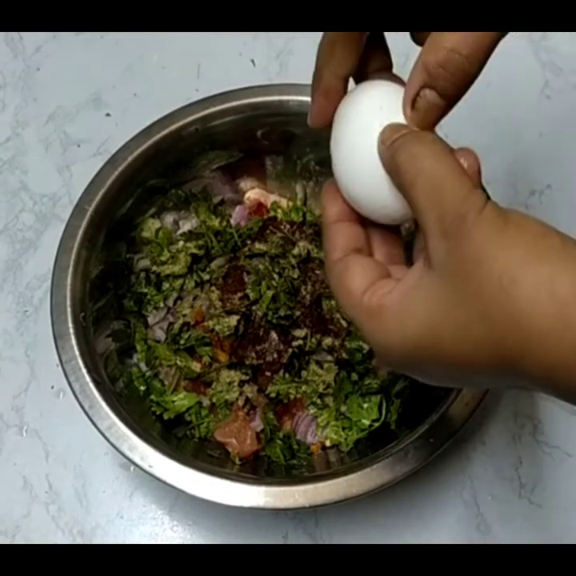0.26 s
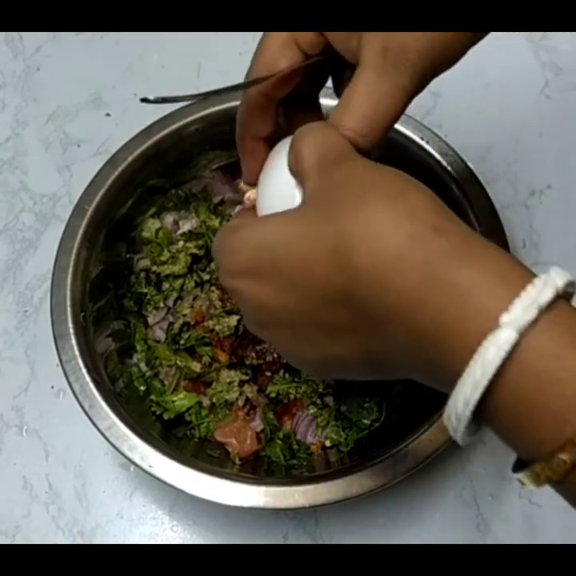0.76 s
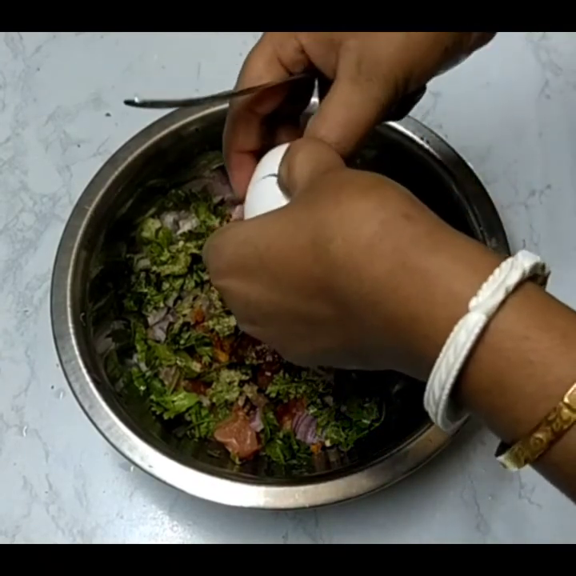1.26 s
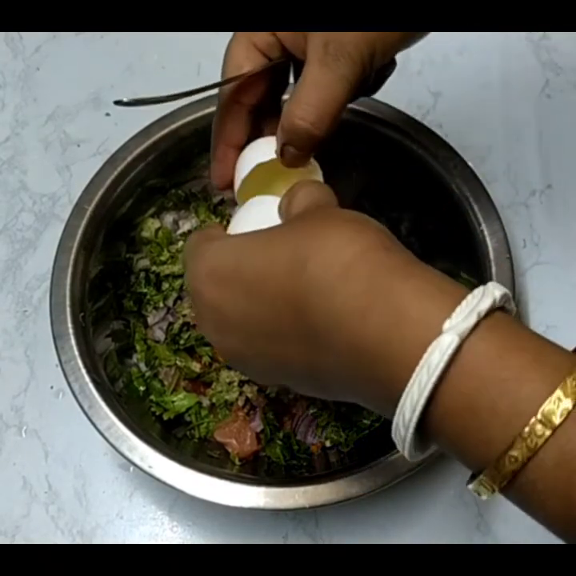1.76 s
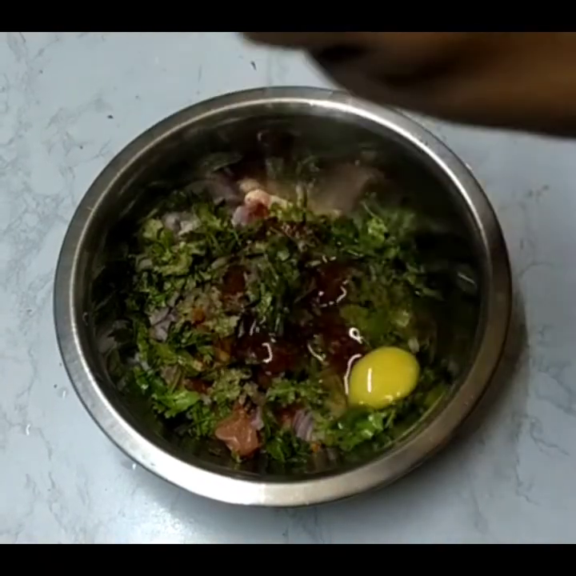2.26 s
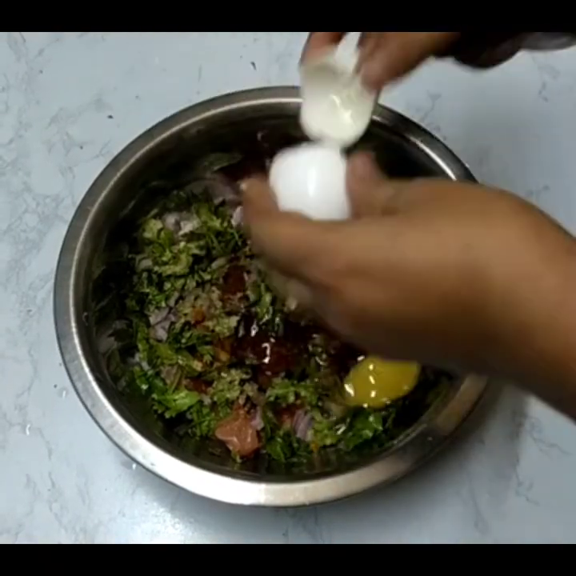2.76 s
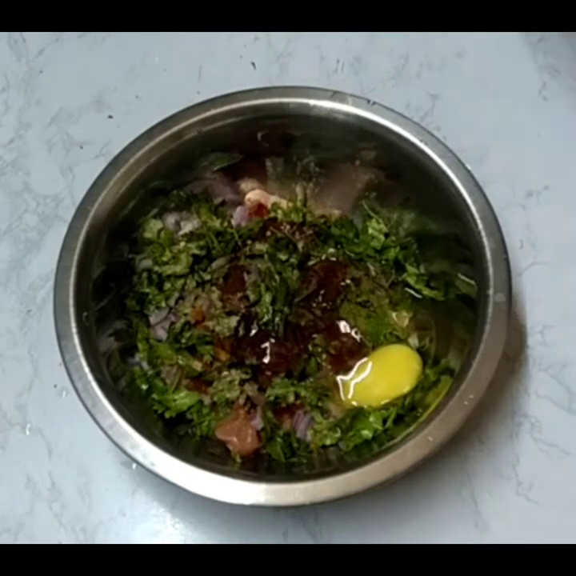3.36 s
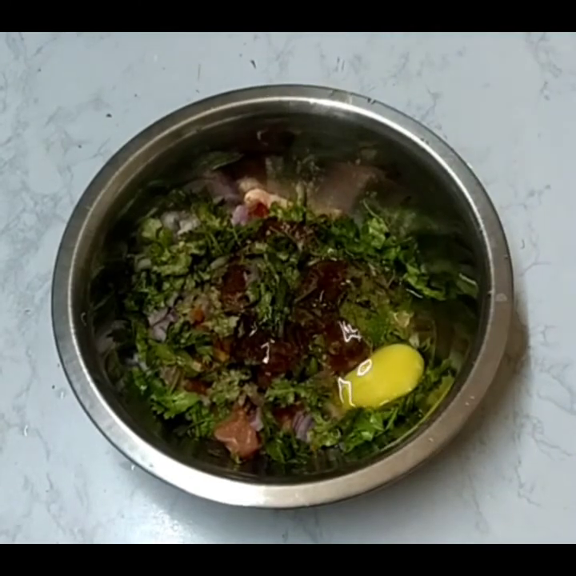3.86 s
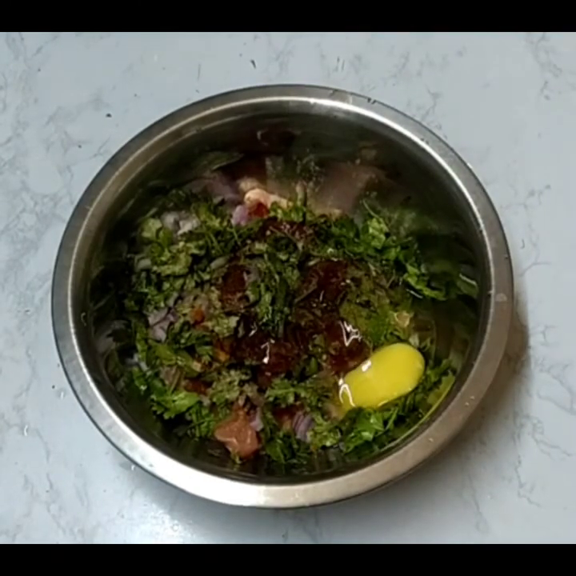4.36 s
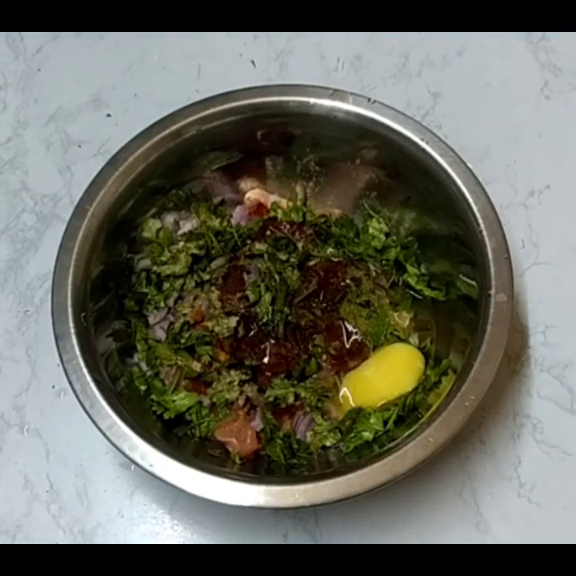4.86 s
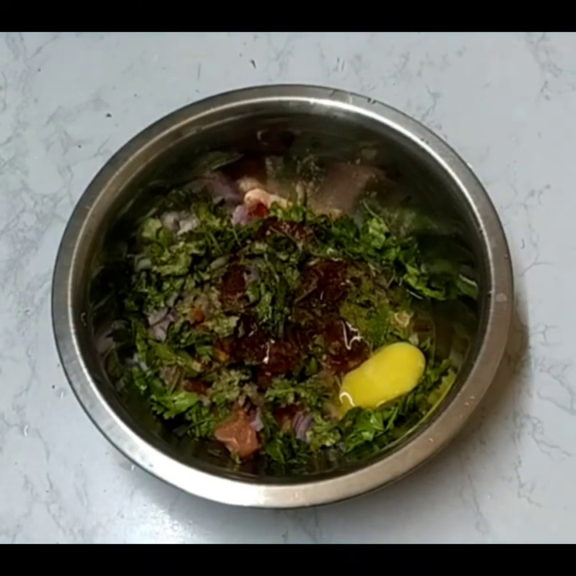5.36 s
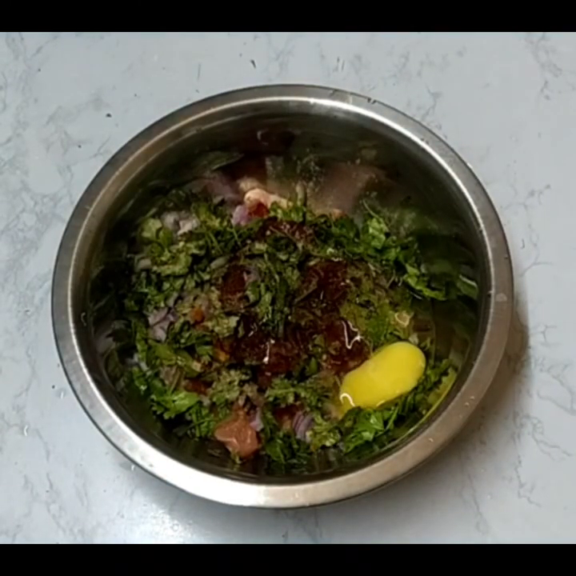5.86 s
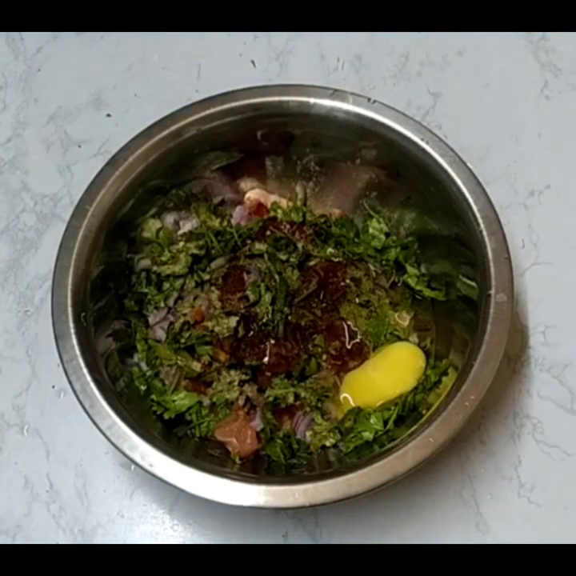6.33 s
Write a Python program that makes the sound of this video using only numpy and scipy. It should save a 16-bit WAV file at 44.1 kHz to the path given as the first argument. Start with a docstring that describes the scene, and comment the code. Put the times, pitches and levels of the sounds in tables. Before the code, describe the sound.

Bangles clink sharply as an eggshell cracks and crumbles, then a hard scrape of steel on stone and a crackly rustle close up.

```python
"""A small tiled kitchen, heard close up at two microphone ports. Bangles clink from the start, as short clusters of
hard rings; an egg shell is cracked in brittle noise snaps and crumbling grit, then its halves are handled and dropped.
Something steel is dragged over the counter, as scattered slips through many resonances; a soft thump of low modes
follows and a bag or cloth rustles to the end, with more snaps. Mains hum and a faint hiss lie under it all."""
import sys
import numpy as np
from scipy import signal
from scipy.fft import rfft, irfft, next_fast_len
from scipy.io import wavfile
from scipy.ndimage import uniform_filter1d, map_coordinates

SR = 44100
rng = np.random.default_rng(int(sys.argv[2]) if len(sys.argv) > 2 else 0)


def materialize(psi):
    """Save the field psi as 16-bit PCM at rate SR to the path in sys.argv[1].

    A 1-D psi becomes a single channel; in a 2-D psi each row is a channel.
    """
    bounded = np.clip(np.atleast_2d(psi).T, -1, 1)
    quanta = np.round(bounded * 32767).astype(np.int16)
    wavfile.write(sys.argv[1], SR, quanta)


N = 290795

# relative spectra of rubbing, bright and dull part: pitch_hz [Hz], level_db [dB per Hz]
BRIGHT_SPECTRUM = [(1200, -38), (2500, -5.5), (4000, -2.5), (6000, -1.5), (8500, 0.5), (11000, -3),
                   (16000, 0)]
DULL_SPECTRUM = [(100, -24), (300, -6), (700, -8.5), (1600, 1), (2500, -6.5), (4000, -11), (8000, -53)]


def bangles():
    """Every contact rings the same hard modes at new strengths, over a short tick."""
    # bangle contacts: start_s [s], level_db, low_modes_db, middle_modes_db, left_right_db [dB]
    contacts = [(0.0, -16, -40, -15, 5), (0.0034, -22, -27, -13.5, -4), (0.0094, -21.5, -25, -28, 2),
                (0.3578, -24.5, -21.5, -7.5, 13), (0.784, -47.5, -16, -9.5, -10),
                (1.02, -48, -22, -15.5, -16), (1.908, -50.5, -31, -8, -5), (2.0494, -51, -22, -10.5, -3),
                (2.1926, -34.5, -19.5, -10.5, 16.5), (2.271, -38, -9.5, -4, -15),
                (2.4599, -39, -10.5, -3, 17), (2.609, -20, -22.5, -9, 24), (2.6145, -17.5, -17, -11, -10),
                (2.6241, -15, -26, -15.5, -14), (2.718, -29, -41, -9, 19),
                (2.7501, -18.5, -27, -13.5, 15.5), (2.8605, -10.5, -29.5, -21, 7),
                (2.8843, -16.5, -23.5, -11.5, 2), (2.95, -25, -28, -15.5, 2),
                (3.245, -24.5, -25.5, -15.5, -1), (4.0468, -28.5, -47, 0, -9),
                (5.0436, -23, -25.5, -15, -5), (5.054, -38, -12, -6, 2.5), (5.4453, -36, -13, -10.5, -4),
                (5.538, -30.5, -26, -13, -4), (5.5452, -17.5, -28, -16, 10),
                (5.882, -37.5, -21, -17.5, 6.5)]
    # ringing modes of a bangle: pitch_hz [Hz], level_db [dB]
    modes = [(2200, -11.5), (2900, 2.5), (3150, 2), (4050, 6.5), (4300, 7), (4850, 3.5), (6000, -7),
             (7500, -9.5), (8150, 2), (8600, 4), (8800, -9.5), (9750, -4), (10600, -34), (11350, -22),
             (11550, -6.5), (11750, -13.5), (11920, -12)]
    hz, level_db = np.transpose(modes)[:, :, None]
    is_low, is_middle = hz < 5500, hz < 10200
    t60_s = 0.025 * np.where(is_low, 0.98, 1)
    t = np.arange(SR // 6) / SR
    onset = 1 - np.exp(-t / 0.00012)
    sounds = []
    for start_s, db, low_db, middle_db, pan_db in contacts:
        group_db = np.where(is_low, low_db, np.where(is_middle, middle_db, 0))
        mode_db = level_db + group_db + rng.normal(0, 2.5, hz.shape)
        pitch = hz * rng.normal(1, 0.0071, hz.shape)  # several bangles, none quite alike
        ring = (amp(mode_db - 60 * t / t60_s) * np.sin(2 * np.pi * pitch * t)).sum(axis=0)
        crisp_noise = np.diff(rng.standard_normal(len(t) + 2), n=2)
        tick = amp(middle_db + 6.5 - 60 * t / 0.02) * crisp_noise  # follows the middle modes
        sounds.append((start_s, pan_db, 3.5, amp(db - 11) * (ring + tick) * onset))
    return placed(sounds)


def snaps():
    """A brittle break: a few ms of bright noise, and the piece that gives way knocks."""
    # snaps of shell and folds: start_s [s], level_db, knock_db [dB], knock_hz [Hz], left_right_db [dB]
    breaks = [(1.2114, -30, -13, 3270, -4), (1.27, -18, -17, 2200, 0), (1.2894, -15.5, -16.5, 2400, -17),
              (1.4747, -29, -6, 3550, 1), (1.5439, -35.5, -11, 2520, -8), (1.744, -34.5, -8.5, 2580, 5.5),
              (3.05, -22.5, -14.5, 2530, 2), (3.0764, -19.5, -27, 3390, 6.5), (3.106, -35, 3.5, 1870, -3),
              (3.1985, -36, 9, 1820, -3.5), (3.3203, -27, -20, 1620, -0.5), (5.226, -35, -1.5, 1275, -3.5),
              (5.281, -37, -9.5, 1600, 17), (6.323, -15.5, -24, 3780, -5), (6.3918, -13.5, -35, 3800, -5.5),
              (6.411, -13.5, -40, 3800, 0.5), (6.429, -20, -39, 3800, 0), (6.4195, -16.5, -31, 3800, -1.5),
              (6.533, -21, -13, 1500, 0), (6.574, -15, -36, 3470, -2), (6.58, -16, -42.5, 3450, -1)]
    t = np.arange(SR // 20) / SR
    sounds = []
    for start_s, db, knock_db, knock_hz, pan_db in breaks:
        burst = 0.09 * unit(amp(-60 * t / 0.005) * rng.standard_normal(len(t)))
        piece = resonances([(knock_hz, knock_hz / 22, 3)])
        knock = amp(knock_db + 22) * filtered(burst, piece)
        crack = np.diff(burst, prepend=0)  # tilted towards the treble
        sounds.append((start_s, pan_db, 2.5, amp(db - 8) * (crack + knock)))
    return placed(sounds)


def shell_crumble():
    """The cracking shell grinds in tiny slips, with no resonant body."""
    # strokes: start_s, rise_s, hold_s [s], level_db, dull_db [dB]
    strokes = [(1.208, .003, .003, -42.5, -16.5), (1.266, 0.0063, 0.023, -34.5, -5.5),
               (1.452, 0.021, .003, -45.5, -23)]
    return rubbing(strokes, grip=(15, 220, 0.94), grit_db=0.5, patchy_db=4.5, wet_db=0)


def shell_halves():
    """Emptied shells are handled and dropped: the slips also excite their hollow resonances."""
    # strokes: start_s, rise_s, hold_s [s], level_db, dull_db [dB]
    strokes = [(3.026, 0.0089, .035, -47, -13), (3.064, 0.0081, 0.0061, -44, -5),
               (3.192, 0.005, .012, -46, -1), (3.24, 0.008, .004, -54.5, -18), (3.3, 0.015, .012, -61, 6)]
    # hollow half shells: pitch_hz, width_hz [Hz], level_db [dB]
    hollows = resonances([(1460, 170, -13), (1820, 260, 4), (2540, 430, 0)])
    return rubbing(strokes, grip=(15, 156, 0.98), grit_db=1.5, patchy_db=5, wet_db=15,
                   body=lambda hz: 1 + abs(hollows(hz)))


def steel_drag():
    """Steel slips over stone, and the dragged vessel colours the slips with its resonances."""
    # strokes: start_s, rise_s, hold_s [s], level_db, dull_db [dB]
    strokes = [(4.04, 0.0021, 0.041, -47, -7.5), (4.109, 0.0051, 0.097, -14.5, -9.5),
               (4.455, 0.038, .025, -26.5, -7), (4.514, 0.011, 0.03, -18.5, -12),
               (4.715, 0.052, .006, -39, -16.5)]
    # modes of the dragged vessel: pitch_hz, width_hz [Hz], level_db [dB]
    vessel = resonances([(550, 39, -16.5), (710, 51, 1), (1090, 60, 6), (1430, 120, 1.5), (1655, 16, 8),
                         (2640, 100, 7.5), (3180, 180, 9.5), (5100, 74, -22), (5550, 51, -31),
                         (5900, 59, -21), (7170, 47, -7), (7500, 50, 6), (8185, 17, 23.5),
                         (9000, 230, 11.5), (10000, 68, -23), (9900, 530, -4), (10830, 99, -22.5),
                         (11400, 68, -8), (12040, 41, 4)])
    # relative spectra of steel on stone, bright and dull part: pitch_hz [Hz], level_db [dB per Hz]
    grind = [(1200, -30), (2500, -9), (3800, -8.5), (5000, 1.5), (6200, 0), (8200, -3.5), (9700, -8),
             (11500, -3), (16000, -4)]
    groan = [(60, -25), (200, -15), (350, -14.5), (600, -6.5), (850, -12), (1100, -5), (1600, -2.5),
             (2500, -3), (4000, -14.5), (8000, -57.5)]
    return rubbing(strokes, grip=(27, 177, 0.73), grit_db=1.5, patchy_db=4.5, wet_db=6.5,
                   bright_spectrum=grind, dull_spectrum=groan, patch_size=(2, 14),
                   body=lambda hz: 1 + 0.39 * abs(vessel(hz)))


def thumps():
    """Soft contacts wake only low modes, with a dull puff."""
    # soft contacts: start_s [s], level_db [dB], pitch_hz [Hz], t60_s [s]
    contacts = [(3.34, -48.5, 107.6, 0.35), (3.369, -48, 187, 0.14), (4.699, -44.5, 211, 0.2),
                (4.757, -48.5, 189, 0.23), (5.363, -31, 195.7, 0.14), (5.409, -40.5, 210.6, 0.16),
                (5.902, -64, 250, 0.29), (6.238, -49.5, 191, 0.46), (6.35, -42, 190.8, 0.46),
                (6.383, -42.5, 250, 0.38), (6.409, -41, 176, 0.29), (6.459, -48.5, 186.6, 0.99),
                (6.569, -34.5, 191, 0.09)]
    # modes of the counter: pitch_ratio [multiple of the thump's pitch], level_db [dB]
    counter = [(.55, -13.5), (1, 4), (1.2, -3), (1.95, -4), (3, -15)]
    t = np.arange(SR // 3) / SR
    onset = 1 - np.exp(-t / 0.0026)
    sounds = []
    for start_s, db, hz, t60_s in contacts:
        modes = sum(amp(level_db) * np.sin(2 * np.pi * ratio * hz * t) for ratio, level_db in counter)
        ring = amp(db - 6.5) * modes
        dull_noise = unit(filtered(rng.standard_normal(len(t)), resonances([(547, 380, 0)])))
        puff = amp(-47.5 + 0.14 * db) * dull_noise  # follows the blow only in part
        sounds.append((start_s, 0, -11, amp(-60 * t / t60_s) * (ring + puff) * onset))
    return placed(sounds)


def cloth_rustle():
    """A bag or cloth rubs in slow, evenly fading strokes, with no resonant body."""
    # strokes: start_s, rise_s, hold_s [s], level_db, dull_db [dB]
    strokes = [(5.214, 0.0155, 0.16, -49, -6.5), (5.435, 0.015, .004, -64.5, -25),
               (5.872, 0.074, .07, -49.5, -25), (6.015, 0.031, .05, -46.5, -22),
               (6.06, 0.15, .12, -41.5, -18.5), (6.316, 0.0067, .04, -38.5, -11.5),
               (6.375, 0.028, 0.01, -39.5, -18), (6.47, 0.13, .04, -35.5, -13)]
    return rubbing(strokes, grip=(37, 85, 1), grit_db=2, patchy_db=1.5, wet_db=-3)


def air():
    """Room rumble and hiss, with a hum that wavers fast in strength."""
    # relative spectrum of the air: pitch_hz [Hz], level_db [dB per Hz]
    air_spectrum = [(20, -17.5), (60, -12.5), (100, -7), (240, -10), (330, -5.5), (480, -8.5), (720, -11.5),
                    (1200, -11.5), (3000, -20), (4800, -26), (6000, -15), (7200, -27), (10000, -28),
                    (16000, -18.5)]
    # hum tones: pitch_hz [Hz], level_db [dB]
    hum_tones = [(99, -75.5), (195, -77), (300, -73), (348, -72.5), (490, -74)]
    t = np.arange(N) / SR
    knots = rng.standard_normal((len(hum_tones), 300))
    hum = 0
    for (hz, db), tone_knots in zip(hum_tones, knots):
        waver = map_coordinates(tone_knots, [t * 24])  # 24 new strengths a second
        hum = hum + np.sqrt(2) * amp(db) * waver * np.sin(2 * np.pi * hz * t)
    hiss = stereo(patchy(patchy_db=2.5), lambda hz: amp(along(air_spectrum, hz)))
    return amp(-58) * hiss + hum


def rubbing(strokes, grip, grit_db, patchy_db, wet_db, bright_spectrum=BRIGHT_SPECTRUM,
            dull_spectrum=DULL_SPECTRUM, body=np.ones_like, patch_size=(5, 8)):
    """Tiny slips of scattered size excite a body and the room, in a bright and a dull part."""
    bright, dull = pressure(strokes, grip)
    slip_sizes = np.minimum(rng.exponential(size=N // 24 + 1), 2.5)
    grit = amp(grit_db * np.repeat(slip_sizes, 24)[:N])  # slips last about half a millisecond

    def part(spectrum):
        slips = patchy(patchy_db, size=patch_size) * grit
        in_room = signal.fftconvolve(slips, walls(wet_db), axes=1)[:, :N]
        return stereo(in_room, lambda hz: amp(along(spectrum, hz)) * body(hz))

    return bright * part(bright_spectrum) + dull * part(dull_spectrum)


def pressure(strokes, grip):
    """Bright and dull strength: each stroke swells, sags while held, then fades, the dull part at its own rate."""
    start, rise, hold, db, dull_db = np.transpose(strokes)[:, :, None]
    sag, fade, dull_share = grip  # dB/s while held, dB/s after it, share of that fade in the dull part
    t = np.arange(N) / SR - start
    swell = np.clip(t / rise, 0, 1) * amp(db - sag * np.clip(t - rise, 0, hold))
    gone_db = fade * np.maximum(t - rise - hold, 0)
    bright = np.linalg.norm(swell * amp(-gone_db), axis=0)  # strokes add in power
    dull = np.linalg.norm(swell * amp(dull_db - dull_share * gone_db), axis=0)
    return bright, dull


def patchy(patchy_db, size=(5, 8)):
    """Two noises with patches of random gain, size = (bands, frames)."""
    z = signal.stft(rng.standard_normal((2, N + 512)), nperseg=256)[2]
    field = rng.standard_normal(z.shape[1:])
    field = uniform_filter1d(field, size=size[0], axis=0)
    field = uniform_filter1d(field, size=size[1], axis=1)
    return signal.istft(z * amp(patchy_db * unit(field)), nperseg=256)[1][:, :N]


def placed(sounds):
    """Each (start_s, left-right dB, room dB, sound) with its own answer from the walls."""
    out = np.zeros((2, N + SR))
    for start_s, pan_db, wet_db, sound in sounds:
        heard = signal.fftconvolve(sound[None], walls(wet_db, pan_db), axes=1)
        out[:, round(start_s * SR):][:, :heard.shape[1]] += heard
    return out[:, :N]


def walls(wet_db, pan_db=0):
    """Left and right room response: the direct sound and a tail whose frequencies die at their own speeds."""
    # decay time of the room: pitch_hz [Hz], t60_s [s]
    decay = [(200, 0.2), (1000, 0.35), (4000, 0.33), (12000, 0.24)]
    hz, t, z = signal.stft(rng.standard_normal((2, SR // 3)), SR, nperseg=256)
    dying = z * amp(-60 * t / along(decay, hz)[:, None])
    tail = stereo(signal.istft(dying, SR, nperseg=256)[1], np.ones_like)
    build_up = np.clip(np.arange(tail.shape[1]) / (0.0031 * SR), 0, 1) ** 2
    tail *= amp(wet_db) * build_up / np.linalg.norm(tail[0])
    tail[[0, 1], [0, 4]] += amp([pan_db / 2, -pan_db / 2])  # direct sound, 4 samples later on the right
    return tail


def stereo(pair, spectrum):
    """Two unrelated signals become a coloured left and right, more alike in the bass than in the treble."""
    # left-right correlation: pitch_hz [Hz], likeness [-1 to 1]
    likeness = [(60, 0.56), (130, 0.41), (290, 0.63), (640, 0.44), (1400, -0.2), (3100, 0.12),
                (15000, -0.13)]

    def mid_side(hz):
        turn = np.arccos(np.clip(along(likeness, hz), -1, 1)) / 2
        return spectrum(hz) * [np.cos(turn), np.sin(turn)]

    mid, side = filtered(pair, mid_side)
    return unit(np.array([mid + side, mid - side]))


def resonances(peaks):
    """Causal response of (Hz, width Hz, dB) peaks."""
    return lambda f: sum(amp(db) * 1j * f * w / (c * c - f * f + 1j * f * w) for c, w, db in peaks)


def filtered(x, response):
    """x times a complex response of frequency."""
    m = 2 * next_fast_len(x.shape[-1] // 2 + SR // 8)
    return irfft(rfft(x, m) * response(np.fft.rfftfreq(m, 1 / SR)), m)[..., :x.shape[-1]]


def along(points, hz):
    """(Hz, value, ..) points read on a log axis, one row for each column."""
    f, *cols = np.transpose(points)
    return np.squeeze([np.interp(np.log(hz + 1), np.log(f + 1), c) for c in cols])


def amp(db):
    """Gain of a level in dB."""
    return 10 ** (np.asarray(db) / 20)


def unit(x):
    """x at rms 1."""
    return x / np.sqrt(np.mean(x ** 2) + 1e-20)


def causal(gain_db):
    """Response with this gain on the FFT grid that rings only after the sound arrives."""
    cepstrum = irfft(gain_db * np.log(10) / 20)
    half = cepstrum.shape[-1] // 2
    cepstrum[..., 1:half] *= 2  # fold negative time onto positive: minimum phase
    cepstrum[..., half + 1:] = 0
    return np.exp(rfft(cepstrum))[..., :gain_db.shape[-1]]


def scene():
    """All sources at the two ports."""
    shell = shell_crumble() + shell_halves()
    return bangles() + snaps() + shell + steel_drag() + thumps() + cloth_rustle() + air()


def record(dry):
    """Each microphone port colours the treble in its own way; nothing passes the band limit."""
    # microphone colour: pitch_hz [Hz], left_db, right_db [dB]
    ports = [(5150, 0.5, 0.5), (9700, 4, 8), (12020, 13.5, 4), (11890, 11, -10), (12300, -30, -33.5),
             (13500, -31, -63.5), (14430, 1.5, -32.5), (15500, -24.5, -41)]
    top_hz = 16300
    return filtered(dry, lambda hz: causal(along(ports, hz)) * (hz < top_hz))


dry = scene()
out = record(dry)
materialize(out)
```